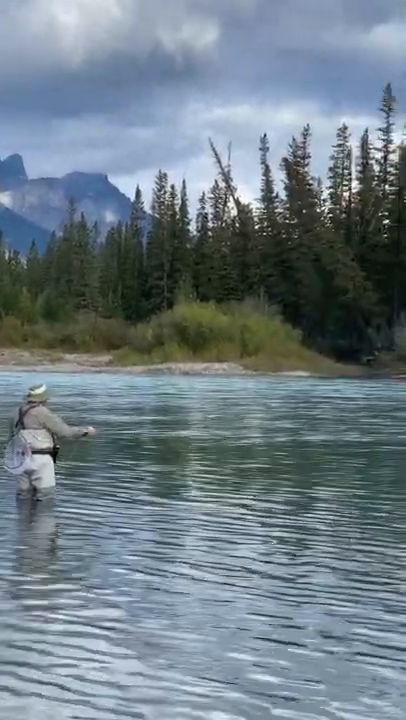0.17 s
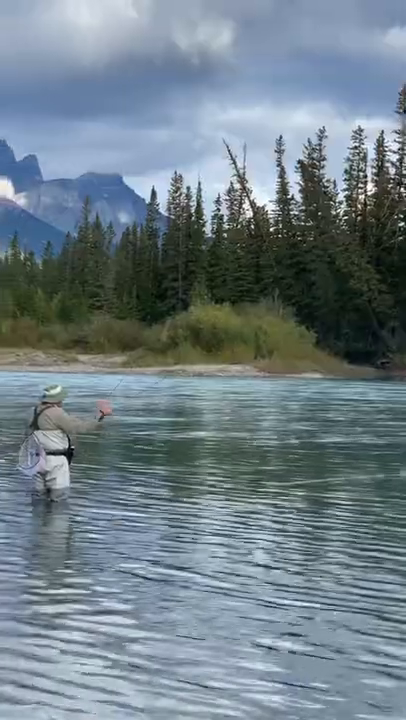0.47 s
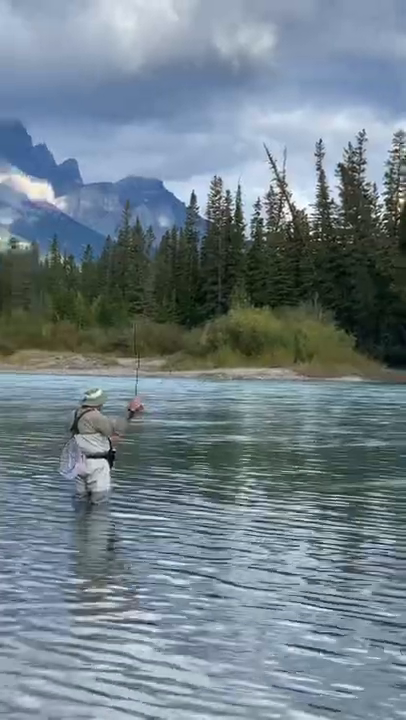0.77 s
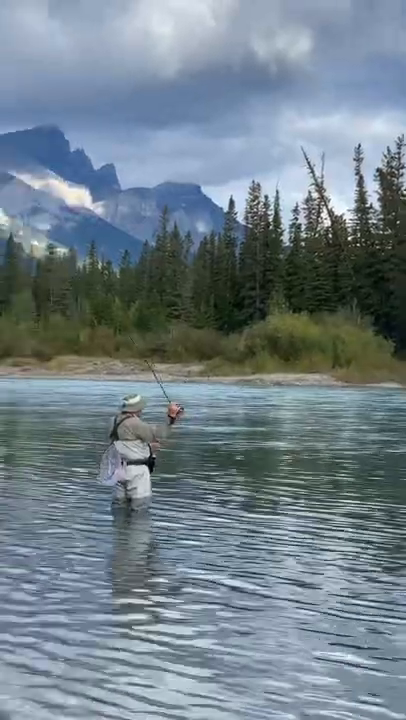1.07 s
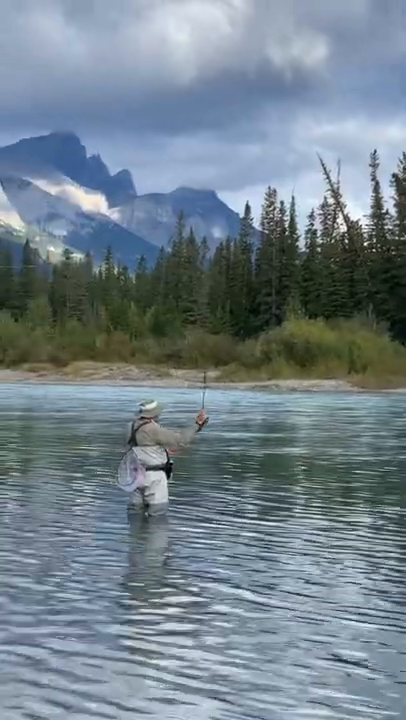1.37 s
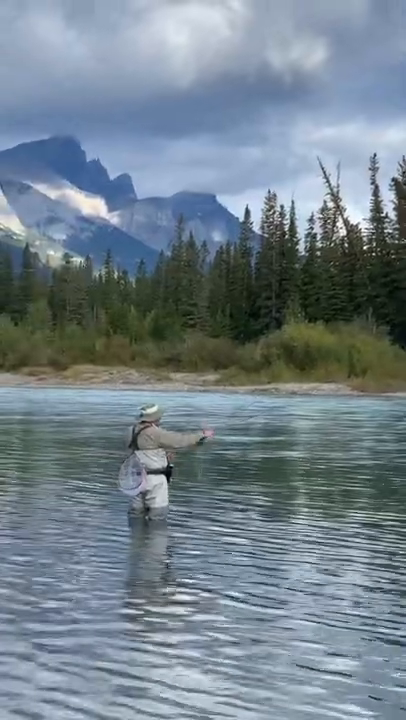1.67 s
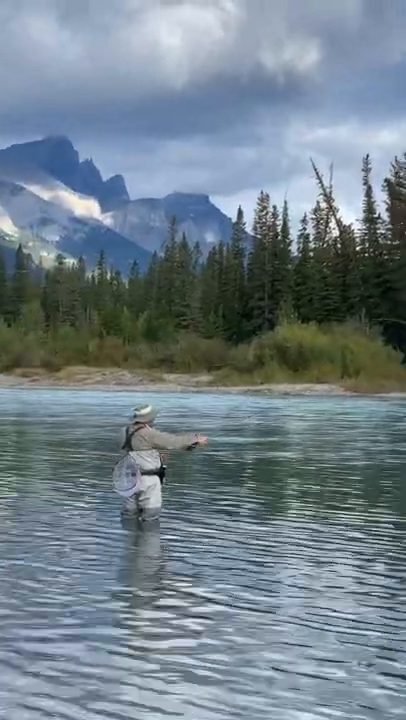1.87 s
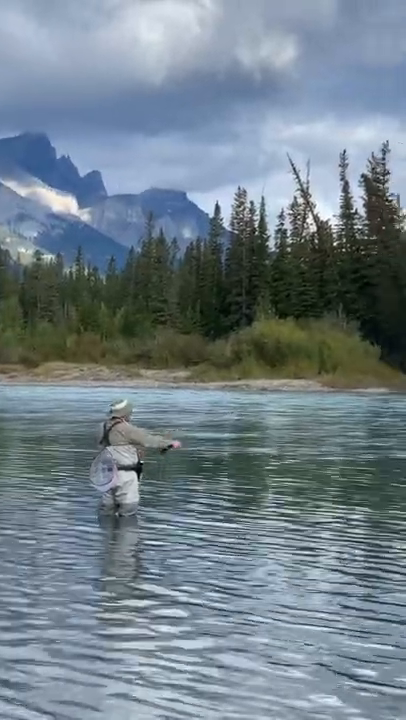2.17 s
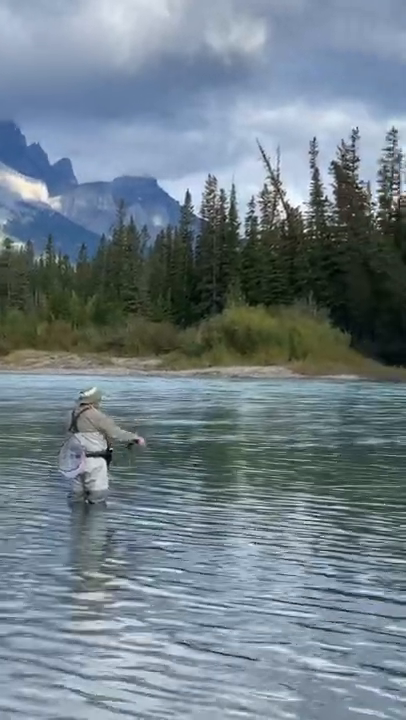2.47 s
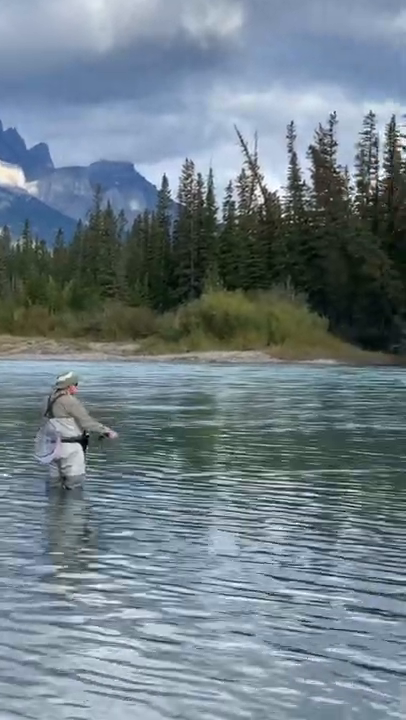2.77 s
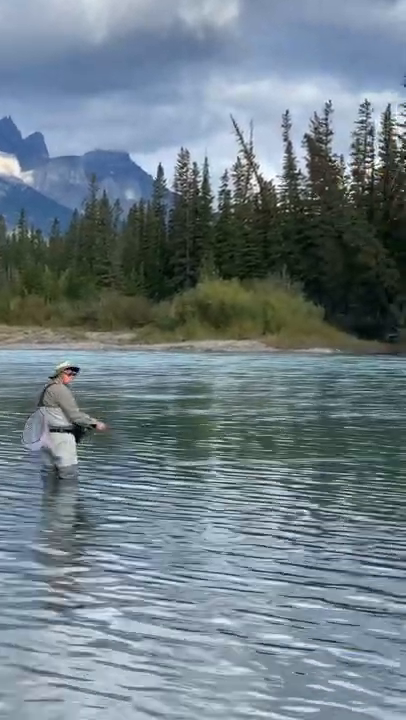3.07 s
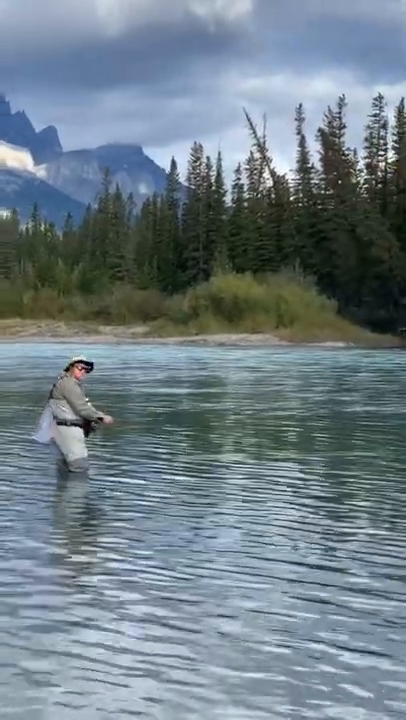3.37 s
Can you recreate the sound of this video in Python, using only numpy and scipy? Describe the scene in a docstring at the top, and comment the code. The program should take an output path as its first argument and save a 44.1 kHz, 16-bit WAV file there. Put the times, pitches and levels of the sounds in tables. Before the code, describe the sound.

Steady river flow and low rumble, heard in stereo by a phone on an open bank. Early watery gurgles and a side rush fade; a fishing line swishes and snaps lightly about halfway through.

```python
"""The bank of a wide mountain river, heard through a phone's two microphone ports as an angler casts a fly line.
Filtered noise makes the deep rumble of wind and far water, a drone surging in it, and a thin high hiss.
The current is noise in flickering bands with small bubbles; a second rush from one side dies away.
Gurgles are short rising tones. The wet line swishes in grainy noise, whips in a falling whistle and ticks
as it is lifted and thrown."""
import sys
import numpy as np
from scipy import signal
from scipy.fft import rfft, irfft, next_fast_len
from scipy.io import wavfile

SR = 44100
rng = np.random.default_rng(int(sys.argv[2]) if len(sys.argv) > 2 else 0)


def to_wav(s):
    """Save 16-bit WAV."""
    ch = np.atleast_2d(s).T  # columns
    pcm = np.round(np.clip(ch, -1, 1) * 32767)  # PCM
    wavfile.write(sys.argv[1], SR, pcm.astype(np.int16))


N = 154791  # samples
T = np.arange(N) / SR  # seconds
COARSE = T[::16]  # time grid for slow controls, seconds
SIZE = next_fast_len(N)
HZ = np.arange(SIZE // 2 + 1) * SR / SIZE

# The line moving through the air: start_s, level_db
SWISH_LEVEL = [(.44, -96), (.49, -82), (.525, -80), (.55, -85), (.585, -78), (.67, -86), (.72, -96),
               (1.48, -96), (1.51, -82), (1.56, -73), (1.59, -66), (1.61, -65), (1.62, -68), (1.626, -57),
               (1.635, -59), (1.65, -65), (1.71, -73), (1.73, -68), (1.75, -76), (1.81, -83), (1.85, -87),
               (1.92, -91), (2.2, -96), (2.3, -85), (2.42, -86), (2.55, -94), (3.5, -96)]
TICK_CYCLES = 5  # for line ticks and spray alike
PITCH_RISE = 0.12  # fraction by which gurgles and bubbles climb


def undb(db):
    """Decibels to gain."""
    return 10 ** (np.asarray(db) / 20)


def curve(table, axis=1):
    """A table column joined by straight lines in time."""
    points = np.array(table)
    return np.interp(T, points[:, 0], points[:, axis])


def walk(rate):
    """Random levels, rate a second, joined smoothly on the coarse time grid; spread near 1."""
    step = (COARSE * rate).astype(int)
    fade = np.sin(np.pi * (COARSE * rate - step) / 2) ** 2
    levels = rng.standard_normal(step[-1] + 2)
    # 1.15 makes up for the spread lost in blending neighbours
    return 1.15 * (levels[step] * (1 - fade) + levels[step + 1] * fade)


def flow(colour, level_db, tilt_db, swell_db, flicker_db, rate, count):
    """Two noises of one colour in count bands an octave; each band swells slowly and flickers on its own."""
    pitch_hz, density_db = np.array(colour).T
    octave, corners = np.log2(HZ + 1), np.log2(pitch_hz)
    shape = undb(np.interp(octave, corners, density_db, left=-90, right=-90))
    spectra = rfft(rng.standard_normal((2, SIZE))) * shape / np.sqrt(np.mean(shape ** 2))
    tilt = np.interp(COARSE, T, tilt_db + 0 * T)
    # Brightening grows from 1 kHz to a peak at 6.5 kHz and fades out over the next octave
    top = np.log2(6500 / 1000)
    out = 0
    for centre in np.arange(corners[0], corners[-1] + 1 / count, 1 / count):
        window = np.clip(1 - count * abs(octave - centre), 0, 1)
        band = irfft(spectra * window, SIZE)[:, :N]
        bright = np.interp(centre - np.log2(1000), [0, top, top + 1], [0, top, 0])
        db = bright * tilt + swell_db * walk(2.9) + flicker_db * walk(rate)
        out = out + band * np.interp(T, COARSE, undb(db))
    return out * undb(level_db)


def add(out, start, length, from_hz, to_hz, db):
    """Adds a short rounded tone, swelling faster than it fades, gliding between two pitches."""
    i = int(start * SR)
    u = np.arange(min(int(length * SR), N - i)) / (length * SR)
    envelope = np.sin(np.pi * u ** 0.6) ** 2
    cycles = length * (from_hz * u + (to_hz - from_hz) * u ** 2 / 2)
    out[i:i + len(u)] += undb(db) * envelope * np.sin(2 * np.pi * cycles)


def ports(x, other, lead, like):
    """Left and right from a shared sound and an unrelated one; the right leads by a phase in radians."""
    like = np.clip(like, 0, 1)
    mid = rfft(x, SIZE) * np.sqrt(1 + like)
    side = rfft(other, SIZE) * np.sqrt(1 - like)
    turn = np.exp(.5j * lead)
    pair = np.array([(mid + side) / turn, (mid - side) * turn])
    return irfft(pair, SIZE)[:, :N] / np.sqrt(2)


def phone(x, other):
    """A sound from ahead, as two ports take it: phase and likeness vary with pitch."""
    # Port differences: pitch_hz, right_lead_rad, likeness (0-1)
    port_table = [(0, 0, .97), (300, .65, .98), (430, 1.3, .72), (520, 2.0, .85), (800, 2.2, .8),
                  (1200, 3.2, .93), (1700, 4.1, .85), (2100, 3.4, .95), (2400, 3.2, .95), (2750, 3.1, .7),
                  (3000, 3.15, .97), (3300, 3.25, .96), (3800, 4.6, .7), (4400, 3.6, .7), (4900, 3.1, .93),
                  (5500, 2.9, .95), (6100, 1.6, .7), (6600, .1, .95), (7500, 0, .99), (8200, -1.2, .75),
                  (9350, -3.1, .99), (10200, -3.2, .98), (11000, -4.5, .7), (11800, -6.25, .99),
                  (13000, -6.3, .99), (13600, -7.9, .7), (14400, -9.4, .98), (16000, -9.8, .9)]
    pitch_hz, lead_rad, likeness = np.array(port_table).T
    return ports(x, other, np.interp(HZ, pitch_hz, lead_rad), np.interp(HZ, pitch_hz, likeness))


def rumble():
    """Wind and far water: deep noise whose bands flicker gently."""
    # Spectrum: pitch_hz, relative density_db (per Hz)
    colour = [(22, -34), (40, -11.5), (60, -0.5), (82, 2), (97, -4.5), (111, 3.5), (128, -0.5), (160, -3.5),
              (210, -3.5), (290, -10.5), (340, -13), (400, -17), (600, -31.5), (1000, -47)]
    # Loudness: start_s, level_db
    level = [(0, -41.5), (.3, -39), (.9, -40.5), (1.5, -41.5), (2.1, -40), (2.5, -42), (2.8, -40.5),
             (3.5, -41)]
    return phone(*flow(colour, curve(level), 0, 0, 0.71, 9.8, count=2))


def drone():
    """A narrow low band of noise that surges in the rumble."""
    # Spectrum: pitch_hz, relative density_db (per Hz)
    colour = [(165, -15.5), (190, -3.5), (210, 0.5), (235, -19)]
    # Surges: start_s, level_db
    level = [(0, -56), (.22, -55.5), (.33, -53), (.45, -45), (.6, -57), (.8, -49), (1, -56.5), (2, -55.5),
             (3.5, -57)]
    return phone(*flow(colour, curve(level), 0, 0, 0.56, 9, count=2))


def hiss():
    """A thin high band of flickering noise that comes up late."""
    # Spectrum: pitch_hz, relative density_db (per Hz)
    colour = [(5000, -20.5), (6000, -4), (6600, 5), (7300, -3.5), (8500, -19.5)]
    # Loudness: start_s, level_db
    level = [(0, -93), (2.1, -97.5), (2.3, -80.5), (2.9, -93), (3.3, -83.5), (3.5, -83.5)]
    return phone(*flow(colour, curve(level), 0, 0, 1.7, 35, count=4))


def bubbles(level_db):
    """Many small bubbles: rising tones at chance times, pitches and strengths, softer when higher."""
    per_s, low_hz, high_hz, cycles = 300, 650, 2300, 28
    spread_db, db_per_octave = 2.0, -6
    out = np.zeros(N)
    for when, pitch, size in rng.random((int(per_s * N / SR), 3)):
        hz = low_hz * (high_hz / low_hz) ** pitch
        # The logarithm makes a few bubbles stand out
        db = db_per_octave * np.log2(hz / 1000) - spread_db * np.log(size + 1e-3)
        add(out, when * T[-1], cycles / hz, hz, hz * (1 + PITCH_RISE), db)
    return out * undb(level_db)


def gurgles():
    """Larger air pockets in the current, each rising a little in pitch."""
    # Air pockets: middle_s, peak_db, start pitch_hz, half_length_s
    pockets = [(.263, -45, 800, .005), (.294, -38, 1130, .004), (.301, -36, 980, .004),
               (.309, -41, 1060, .007), (.319, -34, 950, .003), (.324, -42, 820, .006),
               (.334, -37, 1080, .004), (.408, -43, 800, .008), (0.511, -40, 1056, 0.009),
               (.59, -46, 600, .012), (.6, -43.5, 815, 0.012), (.795, -41, 760, .005),
               (.908, -38, 780, .007), (1.015, -48, 780, .01), (3.34, -48, 1094, 0.012)]
    out = np.zeros(N)
    for middle, db, hz, half_length in pockets:
        add(out, middle - half_length / 2, 2 * half_length, hz, hz * (1 + PITCH_RISE), db)
    return out


def side_rush():
    """A fading rush with bubbles and gurgles, delayed between the ports by its place at one side."""
    # Spectrum: pitch_hz, relative density_db (per Hz)
    colour = [(130, -5), (200, 10.5), (280, 4.5), (380, 4.5), (520, -8.5), (700, -3), (820, 11),
              (930, -12.5), (1070, 8.5), (1350, -9), (1700, -10.5), (2300, -8), (2750, -32.5),
              (3150, -21.5), (3800, -17.5), (4400, -36), (5000, -47.5), (8000, -56.5)]
    # Dying away: start_s, level_db
    level = [(0, -48.5), (.25, -50), (.31, -47), (.37, -51), (.6, -52), (.9, -52.5), (1.5, -55.5),
             (2.3, -59), (3.5, -63.5)]
    lead_s, bubble_db = 0.00023, -10  # right port first; bubbles relative to the rush level
    aside = flow(colour, curve(level), 0, 0.47, 3.1, 14, count=3)
    water = gurgles() + bubbles(curve(level) + bubble_db)
    return ports(aside[0] + water, aside[1], 2 * np.pi * HZ * lead_s, 0.57)


def river():
    """The current ahead: noise in narrow flickering bands with shifting brightness, plus small bubbles."""
    # Spectrum: pitch_hz, relative density_db (per Hz)
    colour = [(150, -16), (400, -4.5), (600, -1.5), (820, -9.5), (1080, 3), (1400, -3), (1700, -3.5),
              (2000, -4.5), (2600, -13.5), (3500, -19.5), (4500, -21.5), (6000, -35), (6700, -44),
              (7500, -53), (10000, -51), (13000, -53.5), (15500, -64.5)]
    # Current: start_s, level_db, brightness (dB per octave above 1 kHz)
    level = [(0, -46.5, -0.5), (.4, -49.5, -1.5), (.65, -47, -2), (1, -46.5, -1.5), (1.4, -48, -1.5),
             (1.65, -47, 0.5), (2, -47.5, -1), (2.15, -48.5, 1.5), (2.35, -44.5, 0.5), (2.65, -48.5, 2.5),
             (2.9, -49.5, 2), (3.2, -48.5, 0.7), (3.5, -46, 0.5)]
    bubble_db = -15  # relative to the rush level
    rush = flow(colour, curve(level), curve(level, axis=2), .4, 2, 12, count=5)
    return phone(rush[0] + bubbles(curve(level) + bubble_db), rush[1])


def crackle():
    """Fine spray flung off the wet line: chance ticks that follow the swish level."""
    per_s, low_hz, high_hz = 700, 3500, 11000
    spread_db, above_swish_db = 2.2, 2
    out = np.zeros(N)
    for when, pitch, size in rng.random((int(per_s * N / SR), 3)):
        hz = low_hz * (high_hz / low_hz) ** pitch
        add(out, when * T[-1], TICK_CYCLES / hz, hz, hz, -spread_db * np.log(size + 1e-3))
    return out * undb(curve(SWISH_LEVEL) + above_swish_db)


def line_ticks():
    """Drops and line ticking on the rod rings: tones a few cycles long, falling in pitch."""
    # Ticks: start_s, peak_db, middle pitch_hz
    tick_table = [(.492, -63, 7500), (.498, -64, 7500), (.519, -63, 7300), (.523, -63, 8000),
                  (.546, -66, 6500), (.5725, -57, 7000), (.5775, -57, 7300), (.589, -63, 6300),
                  (.5935, -59, 11500), (.609, -68, 11000), (.612, -60, 7300), (.623, -65, 10500),
                  (.644, -65, 8000), (1.623, -49, 6000), (1.627, -41, 11500), (1.629, -44, 13000),
                  (1.628, -47, 4300), (1.633, -49, 8000), (1.636, -50, 4600), (1.641, -55, 8500),
                  (1.664, -57, 11000), (1.682, -53, 9000), (1.728, -54, 11500), (1.732, -57, 7500),
                  (2.480, -53, 7000), (2.4803, -52, 12000), (2.4815, -58, 8500)]
    out = np.zeros(N)
    for start, db, hz in tick_table:
        add(out, start, TICK_CYCLES / hz, 1.15 * hz, .85 * hz, db)
    return out


def whip():
    """One falling whistle as the loop unrolls, roughened by fast random level changes."""
    whistle = np.zeros(N)
    add(whistle, start=1.591, length=.022, from_hz=13000, to_hz=5500, db=-68)
    rough = np.interp(T, COARSE, undb(5 * walk(900)))
    return whistle * rough


def line():
    """The cast: airy noise flickering fast enough to sound grainy, with spray, ticks and the whip."""
    # Spectrum: pitch_hz, relative density_db (per Hz)
    colour = [(2000, -19.5), (4000, -2), (6000, 0.5), (7500, -1.5), (9000, 1.5), (12000, -4), (15500, -16)]
    swish = flow(colour, curve(SWISH_LEVEL), 0, 0, 2.5, 150, count=2)
    return phone(swish[0] + crackle() + line_ticks() + whip(), swish[1])


def scene():
    """Rumble, drone, high hiss, side rush with gurgles, river and the cast, summed in stereo."""
    background = rumble() + drone() + hiss()
    water = side_rush() + river()
    return background + water + line()


def record(dry):
    """The phone cuts the top: a steep elliptic low-pass."""
    top_hz, ripple_db, stop_db = 15800, .2, 70
    return signal.sosfilt(signal.ellip(10, ripple_db, stop_db, top_hz, fs=SR, output="sos"), dry)


dry = scene()
out = record(dry)
to_wav(out)
```